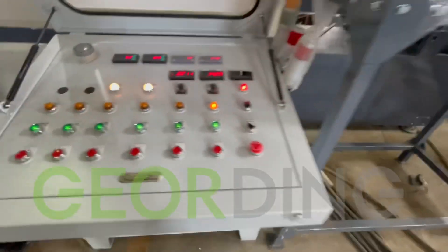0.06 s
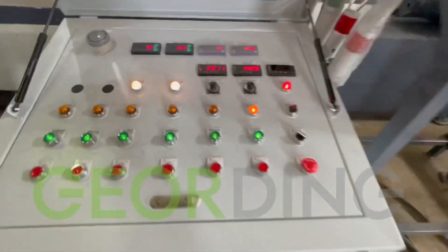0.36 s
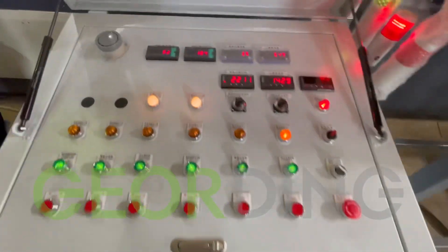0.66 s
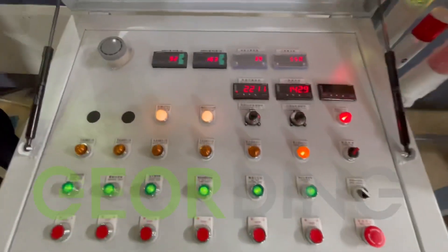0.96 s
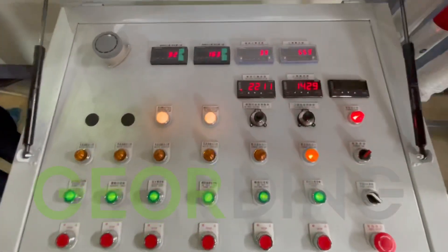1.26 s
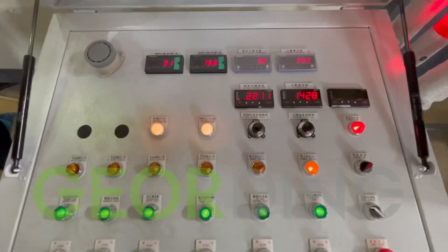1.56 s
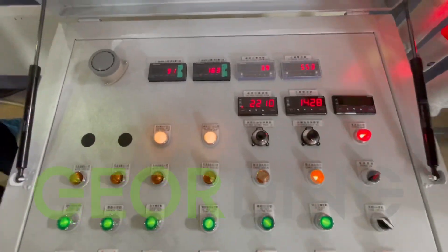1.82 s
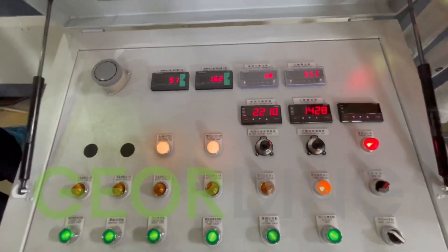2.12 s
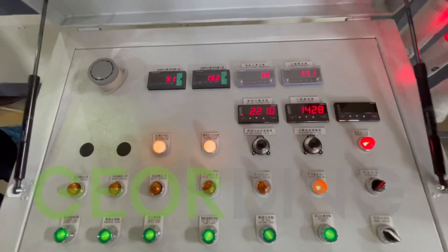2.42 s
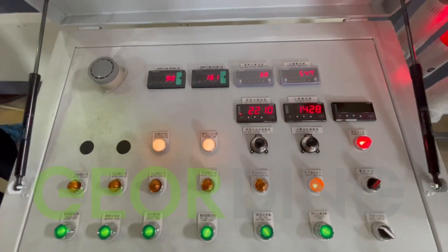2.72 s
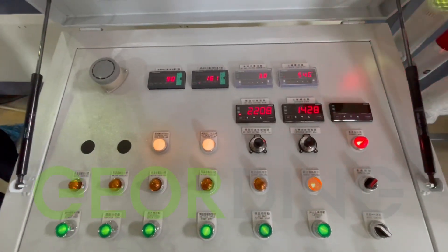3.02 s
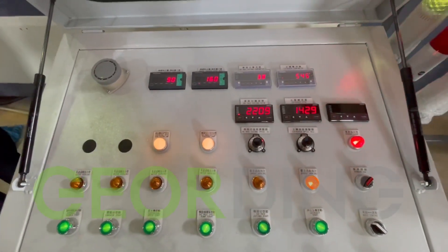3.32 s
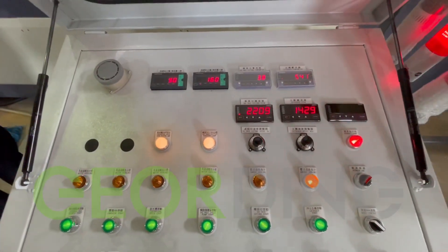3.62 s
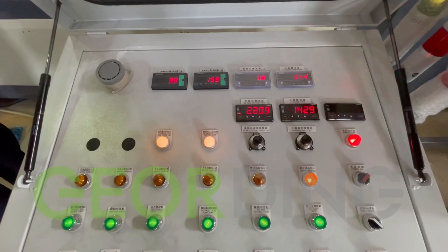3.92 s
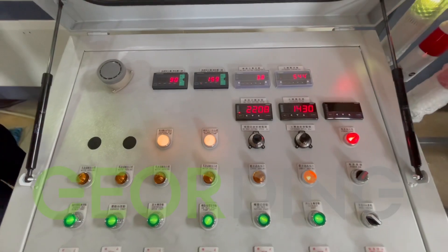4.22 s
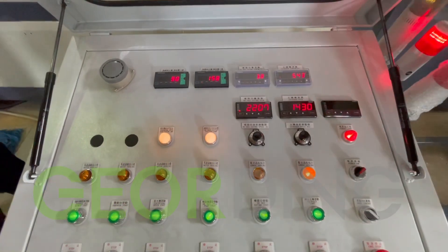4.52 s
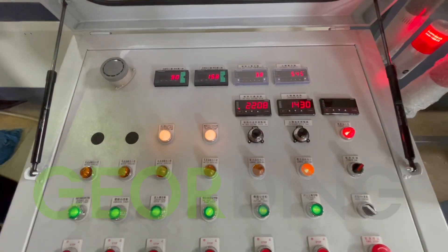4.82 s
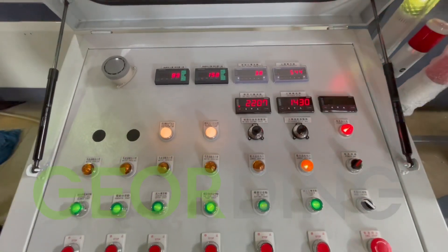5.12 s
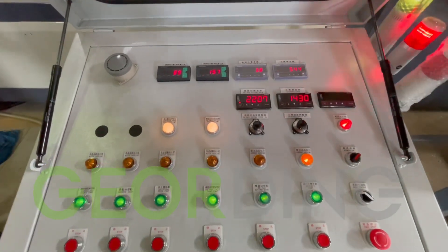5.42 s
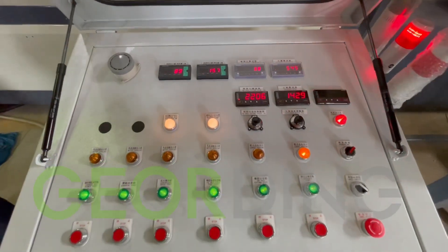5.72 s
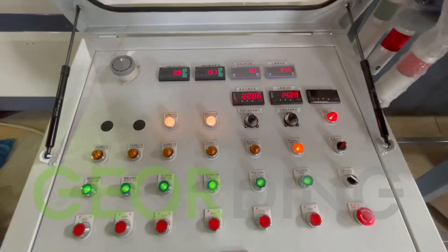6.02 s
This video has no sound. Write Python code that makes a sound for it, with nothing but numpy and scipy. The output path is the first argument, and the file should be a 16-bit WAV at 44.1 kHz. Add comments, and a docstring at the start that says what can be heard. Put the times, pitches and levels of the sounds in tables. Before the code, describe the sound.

A hard electric buzz sounds continuously at the control desk of a factory machine, with a bright, fizzing rattle of sheet metal locked to its pulse. Motors and a blower hold steady whining tones over the even din of the hall. The microphone moves in toward the desk and then eases back a little, so single tones in the buzz swell and dip while the pitch stays the same.

```python
"""A hard electric buzz with a bright rattle, at the control desk of a plastic pelletizing line.
Every half cycle of the mains knocks a drive's core and sets its sheet metal rattling.
Motors and a blower whine over the din of the factory hall. The microphone moves in to the desk
and eases back; its path through the standing waves makes the tones swell and dip."""
import sys
import numpy as np
from scipy import signal
from scipy.fft import rfft, irfft, next_fast_len
from scipy.io import wavfile
from scipy.ndimage import uniform_filter1d

SR = 44100
rng = np.random.default_rng(int(sys.argv[2]) if len(sys.argv) > 2 else 0)


def wav_record(signal):
    """Record a signal, one row per channel, as 16-bit PCM in the file named by sys.argv[1]."""
    frames = np.transpose(np.atleast_2d(signal))
    bounded = np.clip(frames, -1, 1)
    # unit amplitude maps onto the largest positive 16-bit level
    quanta = np.round(bounded * 32767).astype(np.int16)
    wavfile.write(sys.argv[1], SR, quanta)


N = 276507
TIME = np.arange(N) / SR
BUZZ_HZ = 120.1022   # twice the mains frequency
MIDWAY_S = 3   # reference time for dip positions and din level

HUM_ORDERS = [*range(1, 18), 19, 20, 23, 24, 25, *range(27, 35), 37, 38, 39, 40, 42, 43]
# One row per order. Each row: base level in dB, left minus right in dB, left phase lead in rad.
HUM_HARMONICS = [(-50, -2.81, 0.5), (-45, -6, 0.5), (-42.5, -1.5, 1.37), (-50.5, 7.08, 1.85),
                 (-55, -5.91, -1.6), (-48, 7, -1.76), (-35.5, -2.5, 0.63), (-39, 2.5, 1.26), (-41, 6.5, 2),
                 (-41.5, 3, 2.02), (-37, 1.38, 1.7), (-31.5, -3.32, 2), (-27.5, -0.03, 2.5), (-38, -5, 1.3),
                 (-45, -6.5, 2.36), (-48, -8, 2.3), (-49.5, -3, 1.7), (-51.5, -1, -2.5), (-51.5, -9, 3),
                 (-50, -8, -1.3), (-43.5, -2.5, -1.8), (-54, 0, 2.4), (-48, 0.22, -1.6), (-47.5, -6, 1),
                 (-47.5, -7, -0.7), (-48, -7, 0.2), (-50, -8, 0.5), (-57, 0, 1.7), (-54, -1.58, 1.2),
                 (-56.5, -7, 2.3), (-54.5, -1.69, 2.1), (-49.5, -3, 1), (-46.5, 0, 2.5), (-54.5, 0, 2.4),
                 (-57, 0, -4.5), (-55, 0, 0)]

def hum(delay_s, rasp_lag_s, scatter_turns, mid_limp, side_limp):
    """Harmonics of the core's knocks, phased like a struck body ringing down (minimum phase)."""
    knocks = (TIME - delay_s) * BUZZ_HZ
    spectrum_db = np.interp(abs(np.fft.fftfreq(128, 1 / 128)), HUM_ORDERS, np.transpose(HUM_HARMONICS)[0])
    phase_turns = -signal.hilbert(np.log(from_db(spectrum_db))).imag / (2 * np.pi)
    alternate = -cosine(knocks / 2)   # every other knock is stronger
    mid = side = 0
    for order, (db, pan_db, lead_rad) in zip(HUM_ORDERS, HUM_HARMONICS):
        mid_amp, side_amp = mid_side(pan_db, lead_rad) * from_db(db)
        upper, rasp = order > 10, order > 20
        # the rasp trails the knock and the hall scatters its phases
        rasp_turns = scatter_turns * rng.standard_normal() - order * BUZZ_HZ * rasp_lag_s
        turns = order * knocks + phase_turns[order] + rasp * rasp_turns
        side_turns = turns + np.angle(side_amp / mid_amp) / (2 * np.pi)
        mid_db, side_db = hum_swing_db(order, beamed=upper)
        limp = upper * order / 10 * alternate
        mid += abs(mid_amp) * from_db(mid_db) * cosine(turns) * (1 + mid_limp * limp)
        side += abs(side_amp) * from_db(side_db) * cosine(side_turns) * (1 + side_limp * limp)
    return stereo(mid, side)


MID_WAVE_ORDERS = [3, 6, 9, 10, 11, 11, 16, 17, 23, 27, 28, 29, 30, 31]   # 11 meets two reflections
SIDE_WAVE_ORDERS = [10, 11, 12, 13, 14, 24, 39]
# The hum's standing waves, one row per order above. Each row: gain in dB, rise in dB per halving of
# distance, dip strength 0-1, node position in m, node spacing in m, slant of the nodes to the desk.
HUM_MID_WAVES = [(2.5, 7, 0.4, 0.546, 0.49, -1.4), (0.8, -8, 0.52, 0.545, 0.297, 0.07),
                 (1.5, 11.5, 0.45, 0.568, 0.48, 1.6), (2, 1.8, 0.46, 0.538, 0.25, 0.9),
                 (1.7, -3, 0.7, 0.624, 0.27, 0.55), (0.0, -0.5, 0.33, 0.56, 0.32, 3),
                 (0.5, 11, 0.8, 0.68, 0.45, 1), (0, 8, 0.5, 0.7, 0.69, 2), (1, 11, 0.48, 0.69, 0.8, 2),
                 (0, -1, 0.17, 0.58, 0.3, 0.5), (-1.5, 20, 0.7, 0.714, 0.2434, -2.5),
                 (-2.5, 11, 0.7, 0.676, 0.23, -0.5), (-1.5, 10, 0.65, 0.69, 0.39, 0.5),
                 (-1, 12, 0.36, 0.7, 0.45, 0.5)]
HUM_SIDE_WAVES = [(0.5, -6.6, 0.43, 0.73, 0.304, 2.03), (0.3, -11.3, 0.71, 0.76, 0.738, 3.5),
                  (-1.5, 15.9, 0.38, 0.85, 0.567, 4.5), (2.1, 17.6, 0.34, 0.546, 0.45, -0.9),
                  (2.8, 10.6, 0.42, 0.497, 0.705, -1.23), (0.5, 13.5, 0.83, 0.54, 0.292, 1.5),
                  (2, 17.7, 0.81, 0.53, 0.41, 0)]
BODY_ORDERS, LOUDEST_ORDERS, EDGE_ORDERS = [7, 8], [12, 13], [14, 24]
# Each row: time in seconds, relative mid and side levels in dB of order 7, the same of order 8.
BODY_CURVES = [(0.0, -49.0, -46.0, -55.5, -39.0), (0.12, -39.5, -44, -52.0, -40.0),
               (0.3, -39.5, -54, -52, -49.0), (0.45, -42, -49, -36, -44.5),
               (0.57, -33, -45.0, -38.5, -50.0), (0.72, -38.0, -46.0, -44, -48.0),
               (0.95, -38, -51.0, -36, -42.5), (1.15, -37.0, -50, -38.0, -40.5),
               (1.5, -36.0, -50, -44.5, -48.0), (2.1, -34.5, -45, -42.5, -54),
               (3.0, -35.0, -53.5, -42, -49.5), (3.9, -37.0, -52.0, -41.5, -48.0),
               (4.5, -36.5, -49.5, -43, -45.5), (5.0, -38, -49.5, -38.0, -41.0),
               (5.5, -39.5, -46, -41, -43.0), (5.9, -40, -49.0, -43, -49.0),
               (6.27, -38.5, -52.0, -50, -54.0)]
# Each row: time in seconds, relative mid level in dB of each of the two orders.
LOUDEST_CURVES = [(0.0, -62.5, -54), (0.05, -54, -54), (0.1, -58, -47), (0.3, -61, -59), (0.35, -48, -57),
                  (0.38, -48, -52), (0.44, -62, -40), (0.5, -51, -53), (0.68, -53, -38), (0.82, -47, -54),
                  (1.24, -49, -35.5), (1.52, -49, -38), (1.82, -41.5, -39.5), (2.13, -37.5, -35.5),
                  (3.02, -35.5, -53.5), (3.95, -37, -36), (4.43, -35, -36), (5.12, -35.5, -39.5),
                  (5.27, -45, -38), (5.62, -55, -40), (5.68, -47, -40), (5.87, -39, -53), (5.97, -43, -50),
                  (6.04, -36.5, -45), (6.2, -39, -38), (6.27, -39, -39.5)]
EDGE_CURVES = [(0.0, -45.5, -47.5), (0.35, -47, -52.5), (0.6, -49, -53), (0.9, -39, -45),
               (1.35, -46.0, -42), (1.7, -43, -44.0), (2.2, -38.5, -47.0), (3.0, -41.5, -43.5),
               (3.8, -40.5, -47.0), (4.6, -40.5, -46.0), (5.2, -41.0, -51), (5.65, -38.0, -61),
               (6.27, -45.0, -55.0)]

def hum_swing_db(order, beamed, waver_db=0.5, shake_db=1.17, mid_beam_db=2, side_beam_db=10):
    """Mid and side swing of one harmonic along the microphone's path; beamed ones grow as it nears."""
    beam = beamed * distance_halvings()
    side_db = side_beam_db * beam
    if order in SIDE_WAVE_ORDERS:
        side_db = reflections_db(order, SIDE_WAVE_ORDERS, HUM_SIDE_WAVES)
    if order in LOUDEST_ORDERS:
        mid_db = swings_db(LOUDEST_CURVES)[LOUDEST_ORDERS.index(order)]
    elif order in EDGE_ORDERS:
        mid_db = swings_db(EDGE_CURVES)[EDGE_ORDERS.index(order)]
    elif order in BODY_ORDERS:
        column = 2 * BODY_ORDERS.index(order)
        mid_db, side_db = swings_db(BODY_CURVES)[column:column + 2]
    elif order in MID_WAVE_ORDERS:
        mid_db = reflections_db(order, MID_WAVE_ORDERS, HUM_MID_WAVES) + shake_db * drift(5.9)
    else:
        mid_db = waver_db * drift(0.33) + mid_beam_db * beam
    return mid_db, side_db + waver_db * drift(3.3)


# Each row: centre in Hz, nominal width in Hz, relative mid and side levels in dB,
# left minus right in dB, share 0-1 that differs between half cycles.
METAL_RESONANCES = [(2390, 78, -58, -50, -6, 0.01), (2870, 190, -57, -50.5, 12, 0),
                    (3479, 523, -52.5, -59, 3, 0.15), (4150, 410, -53, -53, 5, 0),
                    (4560, 300, -56, -47.5, -3, 0.2), (5420, 300, -55, -44, 2.5, 0.5),
                    (5725, 380, -39.5, -38.5, 6, 0.55), (6374, 410, -39, -50, 3, 0.5),
                    (7454, 540, -38.5, -43, -2, 0.72), (8330, 790, -44, -44, 8, 0.1),
                    (9280, 450, -39, -35, -7, 0.96), (10150, 840, -42.5, -30, -1, 0.85),
                    (10890, 230, -40, -34.5, 2, 0.7), (11270, 210, -38, -38, 0, 0.82),
                    (11670, 310, -39, -47, 1.5, 0.87), (12310, 610, -41, -55, 1, 1)]

def rattle(delay_s, jitter_s, uneven_db, looseness, tail_db, tail_db_per_octave, tail_hz):
    """Each half cycle throws a burst of contacts into the metal's resonances; the hall fills the gaps."""
    knocks = (TIME - delay_s + jitter_s * drift(13)) * BUZZ_HZ + 1
    knock_index = knocks.astype(int)
    force = from_db(uneven_db * rng.standard_normal(int(N / SR * BUZZ_HZ) + 10))
    bursts = force[knock_index] * contact_burst(age_s=knocks % 1 / BUZZ_HZ)
    region_gains = rattle_gains(flutter_db=0.83)
    pattern = np.array([contact_pattern(knocks) for _ in range(2)])   # mid, side
    common = pattern + looseness * rng.standard_normal((2, N))
    quadrature = signal.hilbert(pattern, next_fast_len(N))[:, :N].imag
    alternating = quadrature * (1 - knock_index % 2 * 2)   # half cycles differ in phase, not strength
    out = 0
    for hz, width_hz, mid_db, side_db, pan_db, share in METAL_RESONANCES:
        tail = from_db(tail_db - tail_db_per_octave * np.log2(hz / tail_hz))   # lower bands linger
        contacts = np.hypot(bursts, tail) * (np.sqrt(1 - share) * common + np.sqrt(share) * alternating)
        mid, side = resonance(contacts, hz, width_hz) * region_gains[np.searchsorted(REGION_EDGES_HZ, hz)]
        pan = rms_one(from_db([[pan_db / 2], [-pan_db / 2]]))
        out += stereo(mid * from_db(mid_db), side * from_db(side_db)) * pan
    return out


def contact_burst(age_s, rise_s=0.00038, hold_s=0.0002, fall_s=0.0007,
                  echo_s=0.0015, echo_db=-4, echo_fall_s=0.0012):
    """Envelope of one burst and its near reflection, summed in power."""
    direct = np.minimum(age_s / rise_s, 1) * np.exp(-np.maximum(age_s - rise_s - hold_s, 0) / fall_s)
    echo_rise = np.clip((age_s - echo_s) / rise_s, 0, 1)
    echo_fall = np.exp(-np.maximum(age_s - echo_s - rise_s, 0) / echo_fall_s)
    return np.hypot(direct, from_db(echo_db) * echo_rise * echo_fall)


def contact_pattern(knocks, size=367, count=24, renew_m=0.05506):
    """Dense contacts and reflections that repeat each knock and change as the microphone travels."""
    patterns = signal.resample(rng.standard_normal((count, size)), size * 32, axis=1)
    travel = np.cumsum(np.hypot(np.gradient(distance_m()), SLIDE_M_PER_S / SR)) / renew_m
    row, blend = travel.astype(int) % count, travel % 1
    at = (knocks % 1 * patterns.shape[1]).astype(int)
    return np.sqrt(1 - blend) * patterns[row, at] + np.sqrt(blend) * patterns[(row + 1) % count, at]


def resonance(contacts, hz, width_hz, spread=1.315):
    """A steep zero-phase band, so all resonances ring together; levelled to rms 1 over 0.2 s."""
    half_hz = spread * width_hz / 2
    band = signal.butter(2, [hz - half_hz, hz + half_hz], "band", fs=SR, output="sos")
    ring = signal.sosfiltfilt(band, contacts)
    return ring / np.sqrt(uniform_filter1d(ring ** 2, 8812) + 1e-12)


REGION_EDGES_HZ = [5000, 6050, 8800, 9750, 10650, 11050, 11450, 11900]
# Level swings by region: the four lowest and the highest for mid, all nine for side. Each row: gain in dB,
# rise in dB per halving of distance, dip strength 0-1, dip position in m, dip spacing in m, slant.
# The last rows swing the highest fizz, above 11900 Hz; its mid fades briefly near 0.9 s and 4.8 s.
RATTLE_MID_SWINGS = [(-0.5, 0.5, 0.42, 0.83, 0.72, 2), (-0.4, -0.5, 0.27, 0.42, 0.46, -1.4),
                     (3.5, 22, 0.45, 0.547, 1, -2), (1.5, -4, 0.42, 0.762, 0.91, 2),
                     (-1.5, 2, 0.92, 0.625, 0.23, 1)]
RATTLE_SIDE_SWINGS = [(1, -6, 0.45, 0.77, 0.39, 1.5), (1, 5, 0.25, 0.51, 0.37, -1),
                      (0, -5, 0.2, 0.488, 0.497, -2.52), (2.5, 13, 0.58, 0.53, 1, -3),
                      (0.5, 6.3, 0.22, 0.573, 0.23, -1.69), (0, 3.2, 0.6, 0.523, 0.16, 0),
                      (-1, 0.5, 0.61, 0.767, 0.25, 1.5), (-3, -2.9, 0.26, 0.519, 0.101, -3),
                      (-1.3, 13, 0.92, 0.625, 0.2, 3)]
# Each row: time in seconds, relative mid level in dB of each of the four regions from 9750 to 11900 Hz.
TREBLE_CURVES = [(0.0, -54, -44, -36.5, -35), (0.45, -45, -43, -36.5, -31), (0.68, -33, -30, -30.5, -36),
                 (0.87, -41, -38.5, -36, -33), (1.05, -39, -32, -34, -40), (1.35, -30, -31.0, -31.0, -35),
                 (1.7, -33, -38.5, -39, -34.5), (2.3, -42.5, -48, -38, -32.5),
                 (3.2, -40.5, -41, -38.5, -36.0), (3.9, -34, -35.5, -35, -36.0),
                 (4.5, -33.5, -32.5, -31, -42), (4.95, -36.5, -33, -31, -43), (5.3, -43, -31, -33, -32),
                 (5.65, -45, -41, -34, -31.5), (6.27, -36, -35, -36.0, -41)]

def rattle_gains(flutter_db):
    """Mid and side gain of each frequency region: it swells, dips and flutters lightly."""
    *lower, fizz = [level_swing_db(*row) for row in RATTLE_MID_SWINGS]
    mids_db = lower + swings_db(TREBLE_CURVES) + [fizz]
    sides_db = [level_swing_db(*row) for row in RATTLE_SIDE_SWINGS]
    return [from_db(np.array(pair) + flutter_db * drift(7.0)) for pair in zip(mids_db, sides_db)]


# Each row: frequency in Hz, relative level in dB, left minus right in dB, left phase lead in rad.
MOTOR_TONES = [(46.3, -64, -1.6, -0.2), (57.6, -60, -1, 0.2), (142.5, -55, -3.7, 0.3),
               (244.7, -55.5, 6, 0.21), (356.5, -54.5, -3, 0.8), (397, -41, 2, -1), (407.7, -54, 0, -1.3),
               (422, -51, 2, -0.7), (466, -52, -9, 0.82), (794.3, -41.5, 3.5, -1.08), (776, -55.5, 0, 1),
               (787, -56, 0, -1), (900, -54, 0, 1.2), (1029, -52, 8, 1.1)]
BLOWER_ROWS = [5, 9]   # blade tone, octave
# Standing waves of those two tones. Columns as in HUM_MID_WAVES.
BLOWER_MID_WAVES = [(1.95, -2, 0.36, 0.517, 0.136, 0.85), (1.3, -7, 0.49, 0.593, 0.29, 0.044)]
BLOWER_SIDE_WAVES = [(1, 0, 0.3, 0.99, 0.7, 0), (2, -8, 0.45, 0.53, 0.45, 1)]

def motors(blade_wander_hz, motor_wander_hz, flutter_db, echo_gain):
    """The blower's tones wander with the load and waver with their echoes; other motors run steadier."""
    load = drift(2.76)
    mid = side = 0
    for row, (hz, db, pan_db, lead_rad) in enumerate(MOTOR_TONES):
        mid_amp, side_amp = mid_side(pan_db, lead_rad) * from_db(db)
        if row in BLOWER_ROWS:
            k = BLOWER_ROWS.index(row)
            wander_hz = blade_wander_hz * (k + 1) * load
            mid_echo = echo_gain * (drift(5.2) + 1j * drift(6))
            side_echo = echo_gain * (drift(6) + 1j * drift(6))
            mid_amp *= from_db(level_swing_db(*BLOWER_MID_WAVES[k])) + mid_echo
            side_amp *= from_db(level_swing_db(*BLOWER_SIDE_WAVES[k])) + side_echo
        else:
            wander_hz = motor_wander_hz * drift(2.0)
        turns = np.cumsum(hz + wander_hz) / SR
        gain = from_db(flutter_db * drift(4.8))
        mid += gain * abs(mid_amp) * cosine(turns + np.angle(mid_amp) / (2 * np.pi))
        side += gain * abs(side_amp) * cosine(turns + np.angle(side_amp) / (2 * np.pi))
    return stereo(mid, side)


# Each row: frequency in Hz, relative mid and side noise densities in dB.
DIN_SPECTRUM = [(25, -87.4, -100.7), (48, -75.5, -104), (155, -65, -85), (235, -75, -86),
                (352, -69.5, -77.8), (627, -78, -77), (905, -73, -87), (1620, -71.5, -69),
                (2470, -76.5, -78), (3140, -74, -75), (4200, -74.5, -79), (5160, -78, -76),
                (6560, -72, -78), (8140, -73.5, -78), (11500, -79, -80), (12350, -76, -90),
                (12900, -102, -110)]

def hall_din(bass_pan_db, bass_hz, sink_db_per_s):
    """Far machines and air blend into a slowly sinking noise; its rumble lies to one side."""
    size = next_fast_len(N)
    hz = np.maximum(np.fft.rfftfreq(size, 1 / SR), 1)
    points_hz, *columns_db = np.transpose(DIN_SPECTRUM)
    shapes = [from_db(np.interp(np.log(hz), np.log(points_hz), db)) for db in columns_db]
    mid, side = [rfft(rng.standard_normal(size)) * shape for shape in shapes]
    pan = from_db(bass_pan_db / 2 / (1 + (hz / bass_hz) ** 4))
    din = irfft(stereo(mid, side) * [pan, 1 / pan], size)[:, :N] * np.sqrt(SR / 2)
    return din * from_db(-sink_db_per_s * (TIME - MIDWAY_S))


SLIDE_M_PER_S = 0.022   # the microphone also slides along the desk
# Each row: time in seconds, distance from microphone to drive in m.
MIC_PATH = [(0, 0.88), (.35, 0.88), (.45, 0.78), (.58, 0.781), (.8, 0.71), (1.05, 0.64), (1.5, 0.59),
            (2.1, 0.52), (3.0, 0.528), (4.4, 0.56), (5.1, 0.59), (5.85, 0.66), (6.27, 0.63)]

def distance_m():
    return curves(MIC_PATH)[0]


def distance_halvings(reference_m=0.6):
    return np.log2(reference_m / distance_m())


def level_swing_db(gain_db, rise_db, dip_strength, dip_m, spacing_m, slant):
    """A level that changes with distance and dips at evenly spaced places."""
    place_m = distance_m() + slant * SLIDE_M_PER_S * (TIME - MIDWAY_S)
    depth = 2 * dip_strength / (1 + dip_strength ** 2)
    power = 1 - depth * cosine((place_m - dip_m) / spacing_m)
    return gain_db + rise_db * distance_halvings() + 10 * np.log10(power)


def reflections_db(order, orders, waves):
    """Swing of one hum harmonic, summed over its standing waves."""
    return sum(level_swing_db(*row) for o, row in zip(orders, waves) if o == order)


def curves(rows):
    times_s, *columns = np.transpose(rows)
    return [np.interp(TIME, times_s, column) for column in columns]


def swings_db(rows):
    """Each level curve of a table, about its own mean power."""
    return [20 * np.log10(rms_one(from_db(db))) for db in curves(rows)]


def drift(rate_hz):
    """Slow random motion of rms 1."""
    pole = np.exp(-200 * np.pi * rate_hz / SR)   # one step per 100 samples
    noise = rng.standard_normal(N // 100 + 2002)
    slow = signal.lfilter([1], [1, -2 * pole, pole * pole], noise)[2000:]
    return np.interp(np.arange(N) / 100, np.arange(len(slow)), rms_one(slow))


def mid_side(pan_db, lead_rad):
    """Complex mid and side amplitudes of a tone of rms 1."""
    left = from_db(pan_db / 2) * np.exp(.5j * lead_rad)
    right = 1 / left
    return np.array([left + right, left - right]) / np.hypot(abs(left), abs(right))


def stereo(mid, side):
    return np.array([mid + side, mid - side])


def cosine(turns):
    return np.cos(2 * np.pi * turns)


def from_db(db):
    return 10 ** (np.asarray(db) / 20)


def rms_one(x):
    return x / np.sqrt(np.mean(x ** 2) + 1e-20)


def scene():
    drive = hum(delay_s=0.0061, rasp_lag_s=0.000701, scatter_turns=0.057, mid_limp=0.062, side_limp=0.1)
    metal = rattle(delay_s=0.0062, jitter_s=5e-6, uneven_db=0.5, looseness=0.46,
                   tail_db=-17, tail_db_per_octave=6.5, tail_hz=9000)
    whine = motors(blade_wander_hz=0.5, motor_wander_hz=0.25, flutter_db=1.0, echo_gain=0.21)
    din = hall_din(bass_pan_db=-3, bass_hz=300, sink_db_per_s=0.3)
    return drive + from_db(-0.5) * metal + from_db(-2) * whine + from_db(-0.75) * din


def record(dry):
    """The deepest rumble and the top are cut."""
    dry = signal.sosfilt(signal.butter(2, 18, "high", fs=SR, output="sos"), dry)
    return signal.sosfilt(signal.butter(20, 13300, fs=SR, output="sos"), dry)


dry = scene()
out = record(dry)
wav_record(out)
```